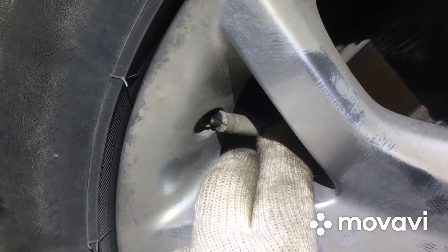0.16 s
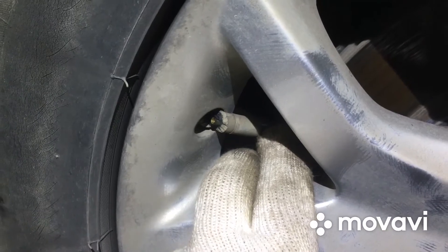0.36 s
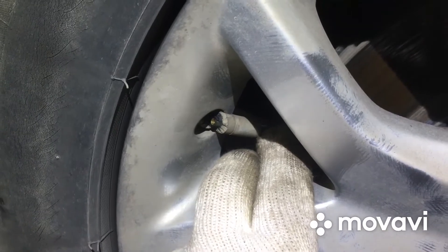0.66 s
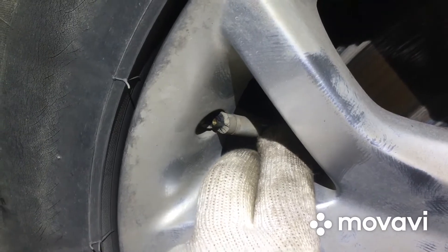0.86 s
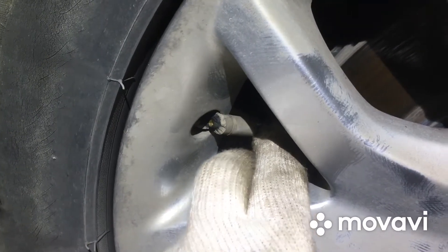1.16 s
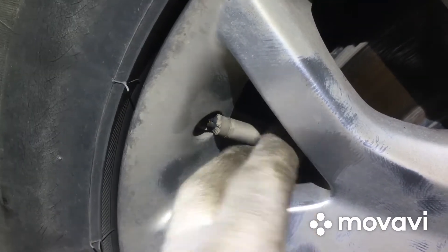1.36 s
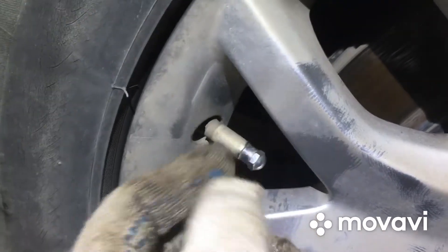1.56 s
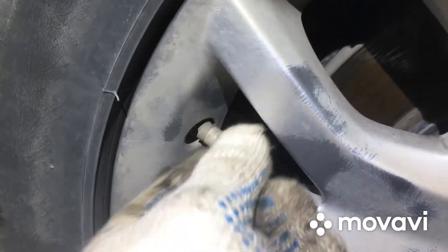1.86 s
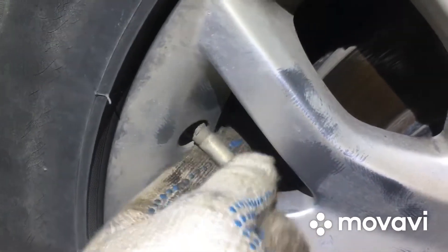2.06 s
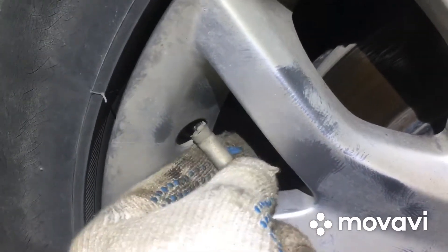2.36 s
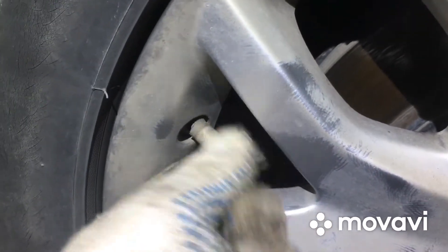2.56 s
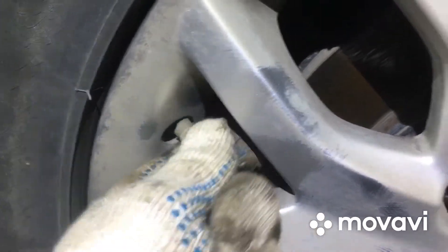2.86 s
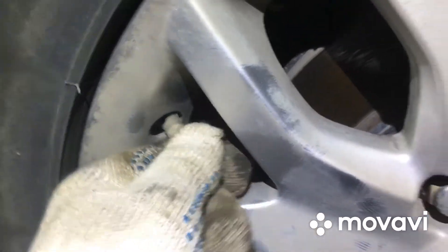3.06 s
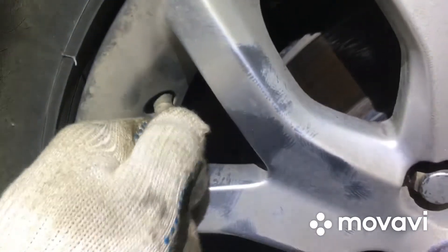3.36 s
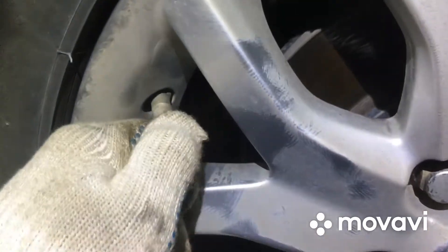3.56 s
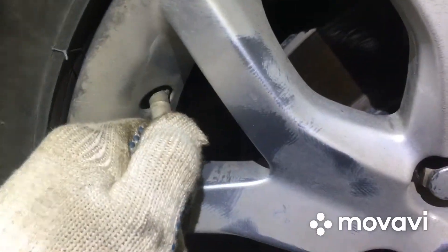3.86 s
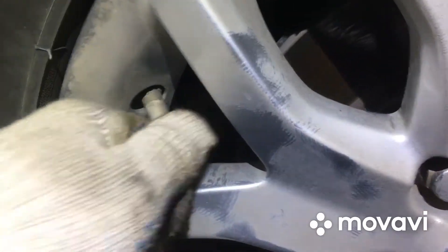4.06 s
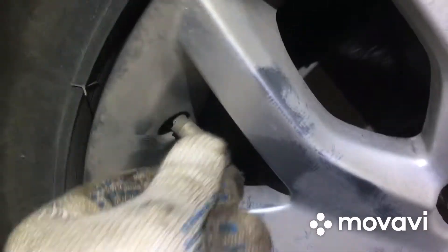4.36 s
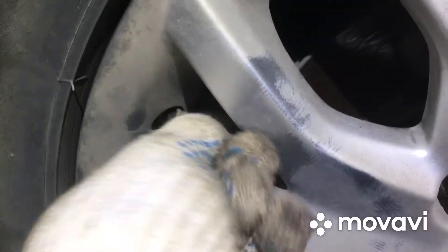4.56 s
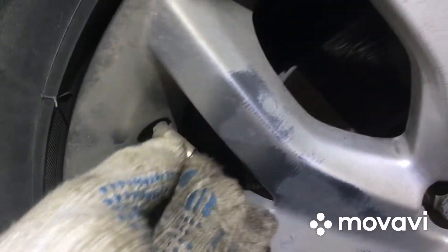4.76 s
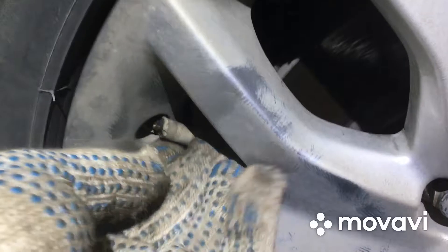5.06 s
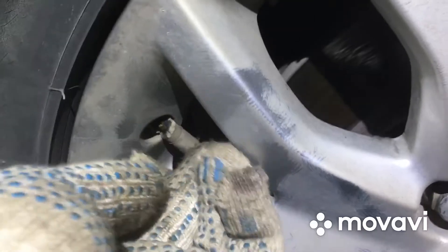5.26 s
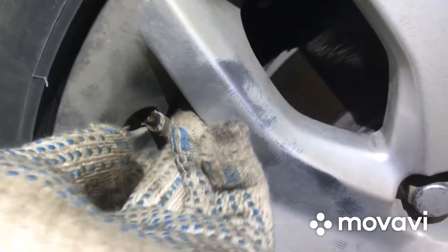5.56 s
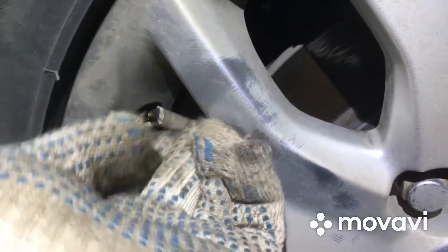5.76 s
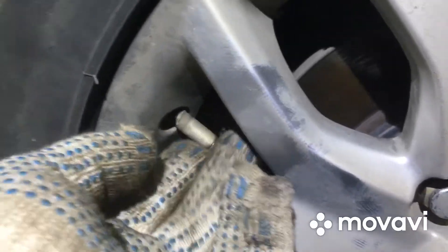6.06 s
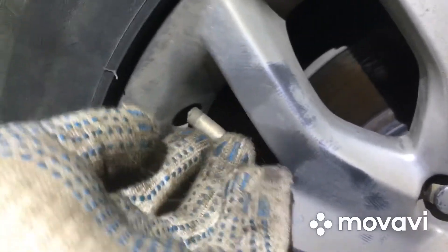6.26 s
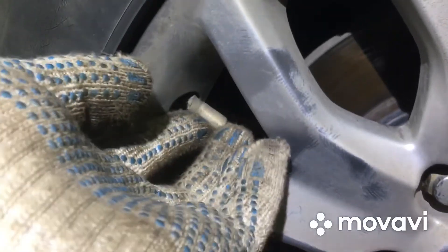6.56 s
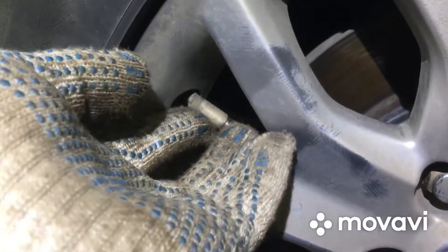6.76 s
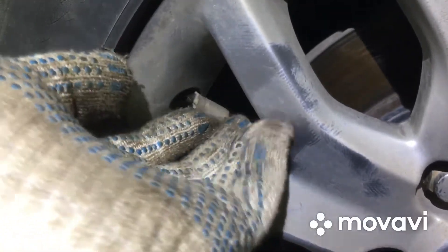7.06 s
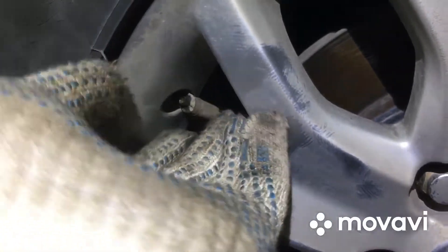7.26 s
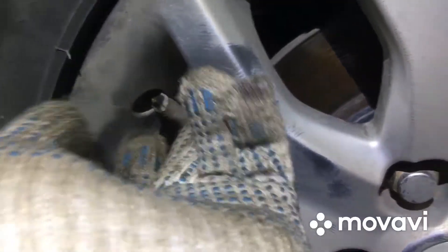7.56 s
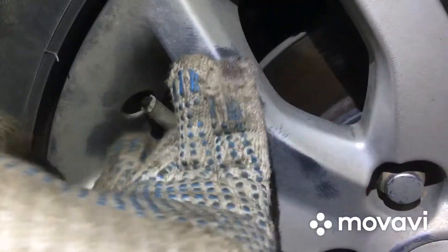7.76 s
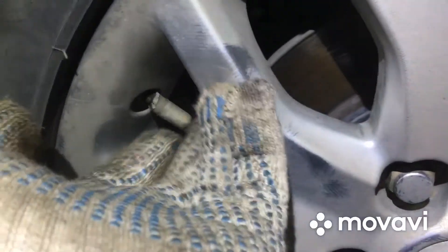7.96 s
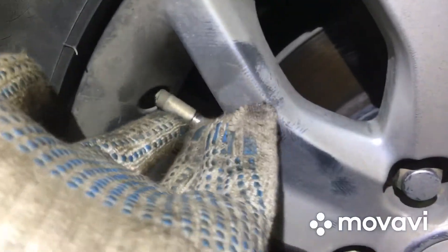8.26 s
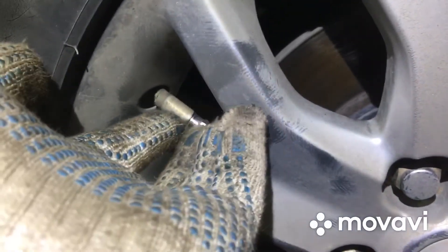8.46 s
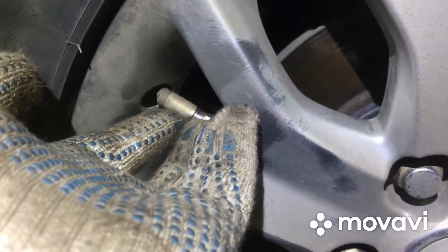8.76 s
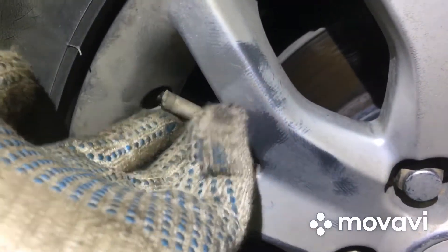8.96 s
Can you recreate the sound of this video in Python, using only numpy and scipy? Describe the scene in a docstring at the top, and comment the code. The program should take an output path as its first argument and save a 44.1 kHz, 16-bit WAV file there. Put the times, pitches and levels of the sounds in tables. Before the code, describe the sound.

Air hisses sharply from a split rubber tyre valve stem bent by a gloved hand, shifting with each grip, ending in thin whistles.

```python
"""At a wheel, close to one microphone, air hisses from a split in a rubber tyre valve stem bent by a gloved hand.
The jet is noise whose spectrum moves with each grip; a resonant noise band is the bore of the stem ringing.
Now and then the split or bore locks into a pure whistle, made of gliding sines.
Stray air rumbles and thumps the microphone as low noise and short swings, and once the rubber ticks over the rim."""
import sys
import numpy as np
from scipy import signal
from scipy.fft import rfft, irfft
from scipy.io import wavfile
from scipy.ndimage import uniform_filter1d

SR = 44100
rng = np.random.default_rng(int(sys.argv[2]) if len(sys.argv) > 2 else 0)


def generate_wav(signal):
    """Clip the signal to [-1, 1] and save it as 16-bit WAV at the path in sys.argv[1]."""
    frames = np.transpose(np.atleast_2d(signal))
    scaled = np.clip(frames, -1, 1) * 32767
    pcm = np.round(scaled).astype(np.int16)
    wavfile.write(sys.argv[1], SR, pcm)


N = 402633  # length in samples

SIZE, HOP = 1024, 256  # short-time frame and step, samples
HZ = np.fft.rfftfreq(SIZE, 1 / SR)[:, None]  # pitch of every bin, as a column
TIMES = np.arange(N // HOP + 5) * HOP / SR  # time of every frame, s


def gain_of(db):
    """Decibels to an amplitude factor; twice the decibels give a power factor."""
    return 10 ** (np.asarray(db) / 20)


def evened(x):
    """Scales to rms 1."""
    return x / np.sqrt(np.mean(x ** 2) + 1e-30)


def follow(rows, t):
    """Every column of a curve table at the times t, in straight lines between its points."""
    times, *columns = np.transpose(rows)
    return [np.interp(t, times, column) for column in columns]


def shape(points):
    """A power spectrum of sum 1 through (f/Hz, level/dB) points, all but silent below the first."""
    f, db = np.transpose(points)
    power = gain_of(2 * np.interp(np.log(HZ + 1), np.log(f), db, left=-100))
    return power / power.sum()


def bell(hz, width):
    """A resonance curve: 1 at hz, one half at the edges of width."""
    return 1 / (1 + (2 * (HZ - hz) / width) ** 2)


def hump(hz, width, steep):
    """The power of a resonance, sum 1 in every frame; a higher steep narrows it and drops its skirts."""
    power = bell(hz, width) ** steep
    return power / power.sum(0)


def lasting(start, end):
    """1 between the two times, with soft ends."""
    soft_s = 0.07
    return np.clip(np.minimum(TIMES - start, end - TIMES) / soft_s + .5, 0, 1)


def held(t):
    """The split keeps its shape under one grip and slides to the next: every setting at the times t."""
    # each grip on the stem: [start/s, middle hiss relative level/dB, middle hiss centre f/Hz,
    # top hiss relative level/dB, roar relative level/dB, deep roar relative level/dB, brightness/dB per octave,
    # bore pitch f/Hz, bore Q before its peak is steepened, air striking the microphone level/dB]
    grips = [(0, -3, 7140, 6, -12.5, -25.5, -1.5, 3470, 2.8, -37.5),
             (.76, -6, 7300, 9, -14.5, -28, 2.1, 3480, 2.8, -44),
             (1.1, -5.5, 7540, 4.5, -17.5, -30, 2.1, 3450, 2.8, -46),
             (1.3, -8, 7700, 3.5, -16.5, -30, -0.5, 3070, 7, -44),
             (1.44, 3, 6650, -1, -18.5, -30, 2, 3250, 9, -66),
             (1.6, 0.5, 6800, -3, -21.5, -33, 2, 3280, 9, -64),
             (1.9, -3, 6500, -9, -20.5, -34, -1.5, 3250, 12, -60),
             (2.02, -12, 8400, -3.5, -18, -29.5, -3.5, 3220, 15, -49),
             (2.44, -4.5, 8150, -5, -20.5, -29, 3, 3270, 8, -62),
             (2.7, -3, 7600, -4, -18, -28, -1.7, 3290, 5, -65),
             (2.93, 3, 8300, -2.1, -14, -26, -0.5, 3290, 5, -64),
             (3.15, -2, 8200, -8, -21, -34.5, -5, 3330, 3.5, -75),
             (3.36, 3.5, 7900, -6, -18.5, -29.5, 8, 3380, 4.9, -67),
             (3.5, 1.5, 7900, -4, -22, -35, -2.8, 3360, 7.6, -64),
             (3.98, 0, 8300, 2, -16, -33, 3, 3240, 5.5, -66),
             (4.17, 2, 7440, -7, -24, -27, 6, 3300, 5.5, -75),
             (4.33, -4, 8600, -9, -16, -29.5, 5.5, 3400, 4.7, -58),
             (4.64, 0, 7900, 6, -13.5, -27.5, 0, 3550, 5, -70),
             (4.79, -1, 9050, 1, -16.5, -28, 2.5, 3200, 5.5, -61),
             (5.05, -11, 7800, -2, -21.5, -24.5, 1.5, 3210, 5.2, -47),
             (5.42, 1, 7450, -4, -13, -16.5, 0.5, 3280, 5, -51.5),
             (5.7, -3.5, 7800, -10, -26, -28.5, -2, 3290, 5.7, -51),
             (6.05, -1.1, 7060, -10, -18.5, -33, -1.5, 3260, 4.4, -63),
             (6.24, -3, 8200, -12, -18, -32, -0.7, 3160, 11, -58),
             (6.55, -5, 8100, -8, -18, -32, -2.5, 3160, 10.6, -59),
             (6.8, -7, 7350, -14, -22, -34, -5.5, 3250, 11, -44.5),
             (7.15, -3, 6870, -10, -17.5, -29, -4.5, 3290, 7.1, -47),
             (7.5, 7.5, 6550, -21, -16, -21.5, 1, 3290, 4.5, -53),
             (7.7, 4, 6700, -11, -24, -38, -0.5, 3280, 8, -58),
             (7.85, 5, 7500, -10, -28, -45, -4, 3205, 12.3, -57),
             (8.05, 6, 7900, -5, -18, -27, -1.1, 3220, 26, -61),
             (8.4, 5, 7850, -10, -19, -27, 2.1, 3190, 16, -64),
             (8.8, 0, 7500, -13, -27, -35, -3.5, 3160, 10, -67),
             (8.97, 7.5, 6400, -16, -19, -40, -9, 3380, 8, -61)]
    change_s = 0.12
    starts, *columns = np.transpose(grips)
    settings = []
    for column in columns:
        steps = zip(starts[1:], np.diff(column))
        moved = sum(step * np.clip((t - start) / change_s + .5, 0, 1) for start, step in steps)
        settings.append(column[0] + moved)
    return settings


def wander():
    """Trembling fingers stray the modes in pitch: a slow random factor near 1 for every frame."""
    stray = 0.015  # rms share of the pitch
    slow = uniform_filter1d(uniform_filter1d(rng.standard_normal(len(TIMES)), size=25), size=25)
    return 1 + stray * evened(slow)


def noise(power, patchy_db, flicker_db):
    """Random short-time spectra of the given power, with drifting patches and a flicker shared by all pitches."""
    real, imaginary, patches = rng.standard_normal((len(TIMES), len(HZ), 3)).T
    patches = uniform_filter1d(patches, size=14, axis=0)  # across pitch
    patches = evened(uniform_filter1d(patches, size=14, axis=1))  # across time
    flicker = evened(uniform_filter1d(rng.standard_normal(len(TIMES)), size=8))
    sway = gain_of(patchy_db * patches + flicker_db * flicker)
    spectra = (real + 1j * imaginary) * np.sqrt(power) * sway
    return signal.istft(spectra, nperseg=SIZE, noverlap=SIZE - HOP)[1][:N] * np.sqrt(3 / 2)


def echo_dips():
    """An echo off the hand or the rim cancels a band for a while: decibels per bin and frame."""
    # cancelled bands: [start/s, end/s, f/Hz, width/Hz, level/dB]
    dips = [(0, 1.9, 4970, 300, -13), (0, 1.4, 2630, 250, -5.5), (4.95, 6.2, 4120, 400, -2.5),
            (5.15, 5.5, 5050, 350, -9), (4.9, 6.3, 7400, 500, -2.5), (5.98, 6.2, 4750, 1200, -10)]
    return sum(db * lasting(start, end) * bell(f, width) for start, end, f, width, db in dips)


def jet_power(echo_db):
    """Turbulence through the split: broad hiss, two roars, two humps, singing modes and the wheel's colour."""
    # broad turbulence: [f/Hz, relative level/dB]
    broad = [(2000, -26), (2800, -13), (4000, -1), (7000, 3), (12000, 1), (16000, -7.5)]
    # roar of the jet: [f/Hz, relative level/dB]
    roar = [(500, -10), (800, -10), (1100, 3.5), (1800, 0), (2300, 4.5), (2800, 4), (3600, 6.5),
            (6000, -10)]
    # deep roar of the jet: [f/Hz, relative level/dB]
    deep = [(90, -11), (200, -5.5), (400, -7.5), (620, -2), (900, -4.5), (1500, -15)]
    # a higher mode sings for a while: [start/s, end/s, f/Hz, width before steepening/Hz, relative level/dB]
    singing = [(0, 1.35, 7020, 300, -8), (0, 1.3, 13400, 1500, 0), (0, 1.397, 11400, 700, -13),
               (1.983, 2.45, 9440, 600, -12), (2.003, 2.2, 12700, 300, -10), (2.2, 2.45, 12900, 400, -18),
               (1.997, 2.446, 4430, 250, -32), (2.75, 3.35, 4450, 300, -21), (1.293, 1.43, 12800, 900, -6),
               (5.9, 6.03, 9100, 700, -10), (3.547, 3.97, 8200, 500, -7), (4.335, 4.41, 11300, 1500, -0.5),
               (4.42, 4.6, 13200, 500, -15), (4.77, 4.854, 12030, 1500, 6.5), (4.85, 5.097, 9800, 400, -14),
               (5.0, 5.8, 6500, 330, -15.5), (5.15, 5.6, 8200, 350, -11), (6.25, 7.202, 9340, 400, -13),
               (6.253, 7.2, 8200, 450, -12.5), (6.81, 7.297, 6200, 400, -11.5),
               (7.45, 7.948, 6460, 450, -5.5), (7.903, 8.2, 13000, 500, -9), (8.2, 8.85, 12800, 400, -12),
               (7.248, 7.5, 8400, 500, -11), (4.85, 5.9, 2520, 447, -18), (8.1, 8.8, 8050, 300, -10)]
    # the hollow wheel colours the jet: [f/Hz, width/Hz, level/dB]
    wheel = [(4000, 230, -4.5), (4520, 330, 3), (4890, 300, -5.5), (7560, 1000, -2.5), (10570, 240, -8),
             (12080, 740, -5)]
    # flow through the split, as the level of the hiss inside the flow band: [t/s, level/dB]
    flow = [(0.0, -21), (1.25, -21), (1.3, -23.5), (1.37, -21), (1.47, -27.5), (1.63, -21), (1.83, -20.5),
            (1.96, -12.5), (2.29, -13), (2.44, -17), (2.54, -27), (2.62, -24.5), (2.75, -16.5), (2.77, -18),
            (3.05, -16), (3.2, -18.5), (3.51, -16.5), (3.58, -13), (3.94, -16), (3.99, -23.5),
            (4.15, -28.5), (4.29, -26), (4.37, -15.5), (4.47, -19), (4.58, -19.5), (4.68, -28), (4.75, -25),
            (4.83, -15.5), (4.91, -19), (5.47, -20.5), (5.72, -18), (6.0, -18.5), (6.08, -24.5),
            (6.35, -17.5), (6.71, -19.5), (6.97, -17), (7.3, -22), (7.8, -19.5), (8.19, -27), (8.8, -27.5),
            (9.03, -25.5), (9.13, -30.5)]
    flow_low_hz, flow_high_hz = 4000, 11800
    top_hz = 12240  # centre of the top hiss

    middle_db, middle_hz, top_db, roar_db, deep_db, tilt_db, *_ = held(TIMES)
    octaves = np.log2((HZ + 1) / 8000)  # brightness pivots here
    jet = gain_of(2 * (-3.0 + tilt_db * octaves)) * shape(broad)
    jet = jet + gain_of(2 * roar_db) * shape(roar)
    jet = jet + gain_of(2 * deep_db) * shape(deep)
    jet = jet + gain_of(2 * (middle_db - 6.0)) * hump(middle_hz, 2800, 2.63)
    jet = jet + gain_of(2 * (top_db - 5.5)) * hump(top_hz, 2550, 1.82)
    for start, end, f, width, db in singing:
        jet = jet + lasting(start, end) * gain_of(2 * db) * hump(f * wander(), width, 1.9)

    wheel_db = sum(db * bell(f, width) for f, width, db in wheel)
    jet = jet * gain_of(2 * (echo_db + wheel_db))
    # the flow alone sets how loud the band is, whatever the shape of the split
    in_band = (HZ > flow_low_hz) * (HZ < flow_high_hz)
    jet = jet / (jet * in_band).sum(0)
    return gain_of(2 * follow(flow, TIMES)[0]) * jet


def bore_power(echo_db):
    """The jet's turbulence rings the lowest mode of the stem's bore: one resonant band of noise."""
    # how hard the jet blows the lowest mode: [t/s, level before the echo/dB]
    blowing = [(0, -28), (1.39, -27), (1.46, -40), (1.86, -56), (2.0, -17.5), (2.31, -21.5), (2.41, -17.5),
               (2.47, -47), (2.65, -56), (2.76, -37), (2.9, -25), (3.01, -29.5), (3.28, -32), (3.5, -33),
               (3.77, -19), (3.93, -29.5), (4.0, -41), (4.29, -49), (4.36, -29), (4.61, -26), (4.66, -37),
               (4.76, -40), (4.84, -23.5), (5.03, -20.5), (5.21, -23), (5.98, -20.5), (6.05, -30),
               (6.17, -29.5), (6.3, -18), (6.72, -21), (6.97, -14), (7.17, -18), (7.48, -25.5), (7.73, -24),
               (7.85, -18.5), (8.04, -19.5), (8.08, -24), (8.25, -23.5), (8.6, -33), (8.72, -29),
               (8.84, -22.5), (9.13, -23)]
    *_, hz, q, _ = held(TIMES)
    blown_db = follow(blowing, TIMES)[0]
    return gain_of(2 * (blown_db + echo_db)) * hump(hz * wander(), hz / np.maximum(q, 1), 1.725)


def hiss():
    """Jet and ringing bore are one noise, so patches and flicker move both together."""
    echo_db = echo_dips()
    return noise(jet_power(echo_db) + bore_power(echo_db), patchy_db=1.14, flicker_db=0.5)


def buffet():
    """Lumpy low rumble where the jet reaches the microphone: filtered noise with a random swell."""
    # colour of the rumble: [f/Hz, relative level/dB]
    thud = [(20, -30), (35, -5), (55, 10), (80, 0.5), (120, -3), (190, -12.5), (300, -24), (450, -47)]
    f, db = np.transpose(thud)
    bins = np.fft.rfftfreq(N, 1 / SR)
    colour = gain_of(np.interp(np.log(bins + 1), np.log(f), db, left=-100, right=-100))
    rumble = evened(irfft(rfft(rng.standard_normal(N)) * colour, N))
    lumps = evened(uniform_filter1d(uniform_filter1d(rng.standard_normal(N), size=1500), size=1500))
    strike_db = np.interp(np.arange(N) / SR, TIMES, held(TIMES)[-1])
    return rumble * gain_of(strike_db + 2.4 * lumps)


def bumps(rows, turns, ragged):
    """One short swing each, about that many cycles long, with a share of flutter about an octave higher."""
    out = np.zeros(N)
    for crest_s, db, hz in rows:
        at = round(crest_s * SR) + np.arange(-3000, 3000)
        cycles = hz * (at / SR - crest_s)
        band = signal.butter(2, [1.3 * hz, 2.6 * hz], "band", fs=SR, output="sos")
        flutter = evened(signal.sosfilt(band, rng.standard_normal(len(at))))
        swing = np.cos(2 * np.pi * cycles) + ragged * flutter
        out[at] += gain_of(db) * swing * np.exp(-(2 * cycles / turns) ** 2)
    return out


def rim_tick():
    """The rubber snaps over the rim: a brief, nearly clean swing."""
    # the snap: [crest t/s, level of the swing without flutter/dB, f/Hz]
    tick = [(2.8917, -2.5, 3400)]
    return bumps(tick, turns=1.2, ragged=.05)


def whistles():
    """The bore or the lips of the split lock into a tone: gliding sines, each under one arch."""
    # tones: [start/s, length/s, rms level at the crest/dB, first f/Hz, last f/Hz]
    tones = [(4.615, 0.027, -14, 12500, 12610), (8.026, 0.037, -17.5, 3190, 3140),
             (8.072, .13, -11.5, 3200, 3203), (8.718, 0.043, -22.5, 13050, 12800),
             (8.733, 0.1, -7.5, 3208, 3113)]
    pointed = 1.05  # exponent of the arch
    sag = 1.93  # the glide steepens toward its end
    out = np.zeros(N)
    for start, length, db, first_hz, last_hz in tones:
        at = np.arange(round(start * SR), round((start + length) * SR))
        share = np.linspace(0, 1, len(at))
        pitch = first_hz + (last_hz - first_hz) * share ** sag
        tone = np.sin(2 * np.pi * np.cumsum(pitch) / SR)
        arch = abs(np.sin(np.pi * share)) ** pointed
        out[at] += np.sqrt(2) * gain_of(db) * arch * tone
    return out


def puff_thumps():
    """Stray puffs of the jet thump the microphone: low swings roughened by flutter."""
    # single puffs: [crest t/s, level of the swing without flutter, before the bass cut/dB, f/Hz]
    puffs = [(5.068, -32, 60), (5.1, -19, 94), (5.125, -19.5, 57), (5.15, -21, 69.5), (5.3, -31, 81),
             (5.47, -35, 70), (6.71, -30.5, 55), (6.82, -33, 53.6), (6.89, -32, 75), (6.955, -38, 90),
             (7.07, -31.5, 65.4), (7.14, -33, 65), (7.18, -39, 70), (7.24, -40, 55), (7.31, -42, 70),
             (7.395, -36, 70), (7.485, -31, 104), (7.555, -36, 69), (7.83, -44, 90), (7.86, -37, 100)]
    return bumps(puffs, turns=1.9, ragged=0.34)


def scene():
    """One microphone: both channels alike."""
    mono = hiss() + buffet() + rim_tick() + whistles() + puff_thumps()
    return np.tile(mono, (2, 1))


def record(dry):
    """The microphone loses the deepest bass, peaks past full scale are clipped, then the treble is cut."""
    edge_hz = 15745
    thin = signal.sosfilt(signal.butter(3, 38, "high", fs=SR, output="sos"), dry)
    band = signal.firwin(1535, edge_hz, window=("kaiser", 9), fs=SR)
    return signal.oaconvolve(np.clip(thin, -1, 1), band[None], "same")


dry = scene()
out = record(dry)
generate_wav(out)
```